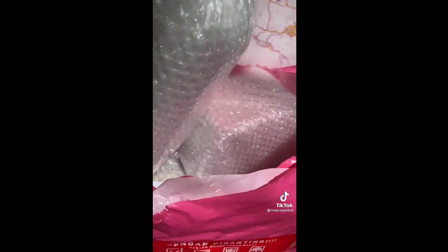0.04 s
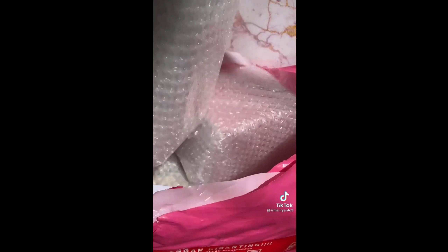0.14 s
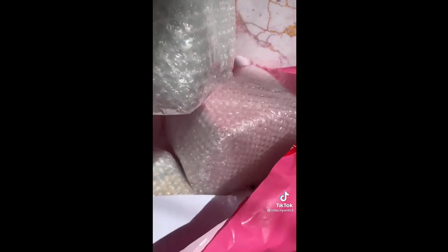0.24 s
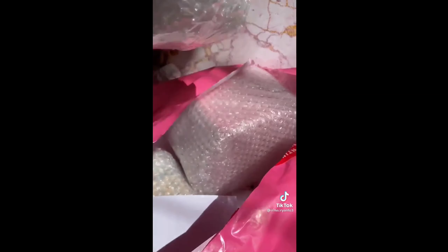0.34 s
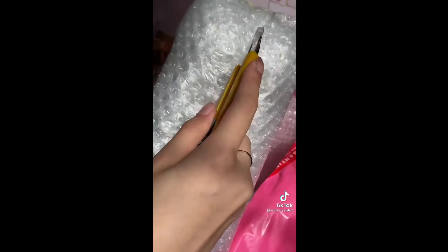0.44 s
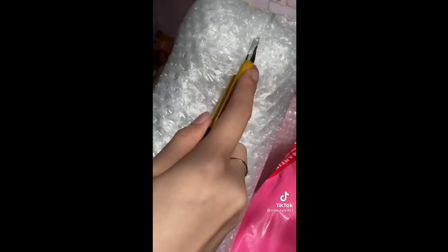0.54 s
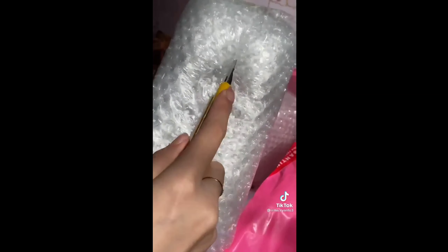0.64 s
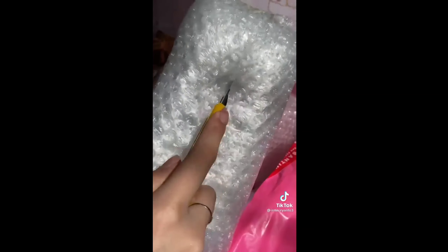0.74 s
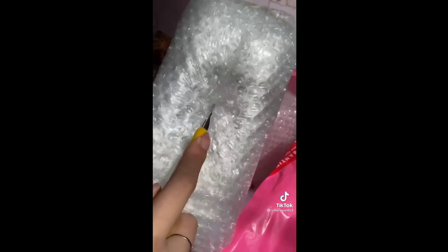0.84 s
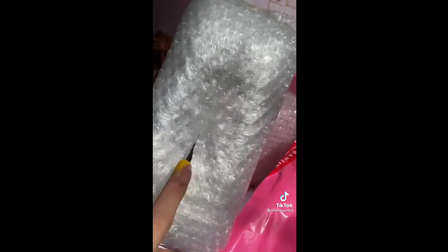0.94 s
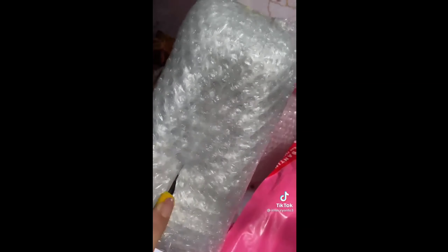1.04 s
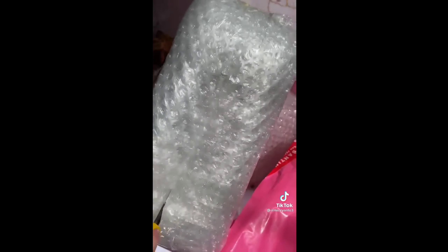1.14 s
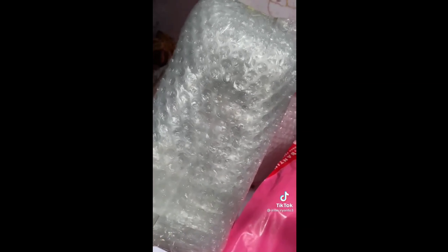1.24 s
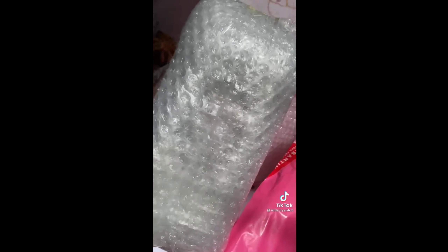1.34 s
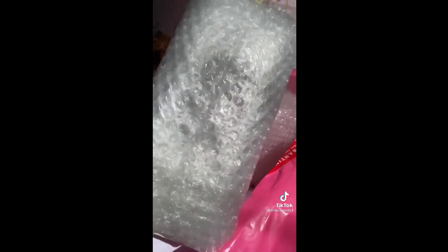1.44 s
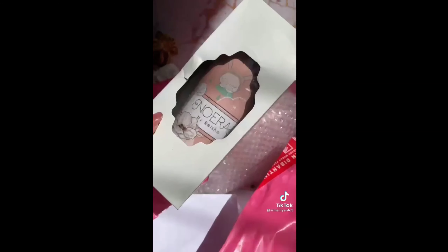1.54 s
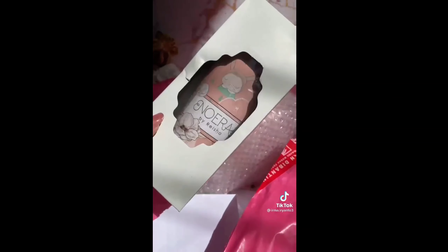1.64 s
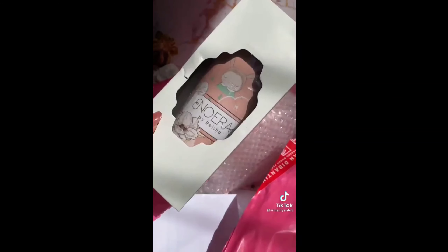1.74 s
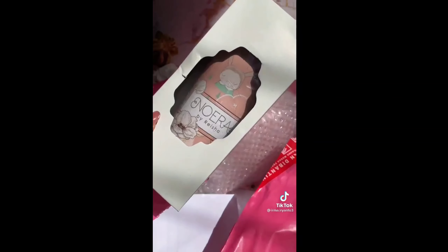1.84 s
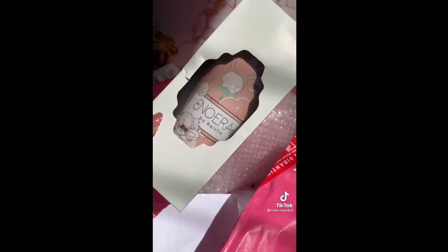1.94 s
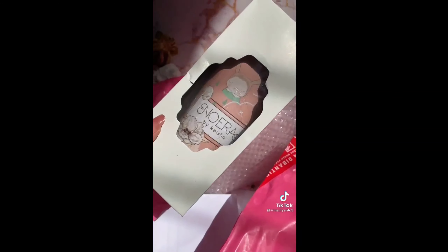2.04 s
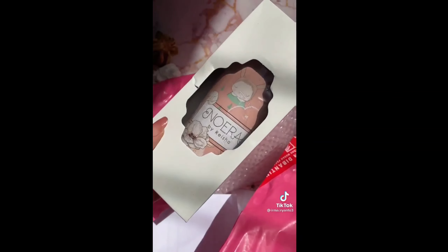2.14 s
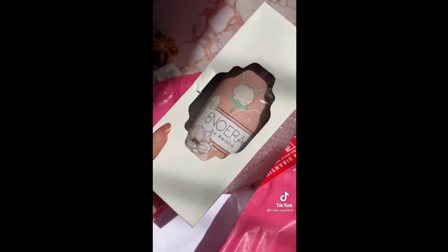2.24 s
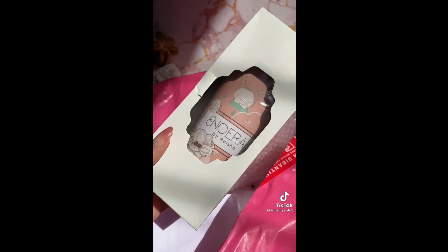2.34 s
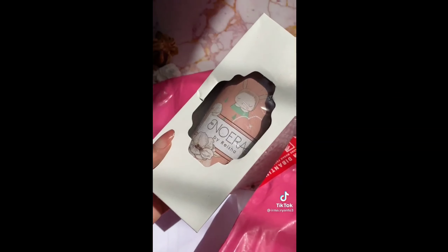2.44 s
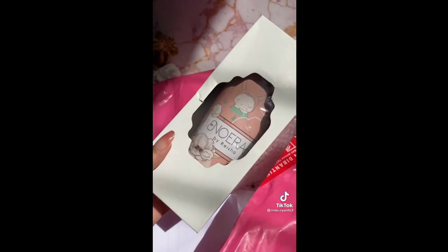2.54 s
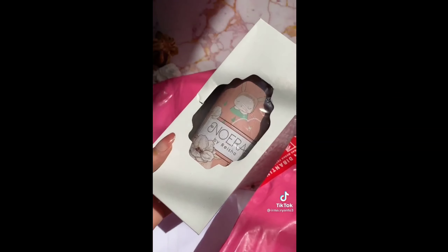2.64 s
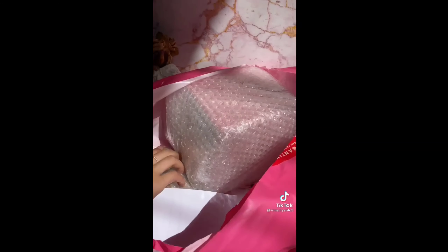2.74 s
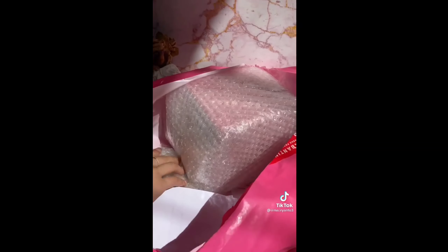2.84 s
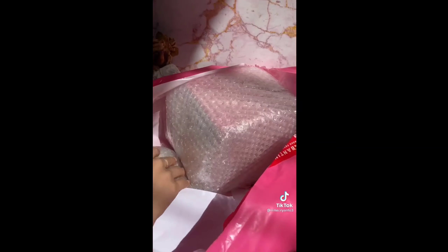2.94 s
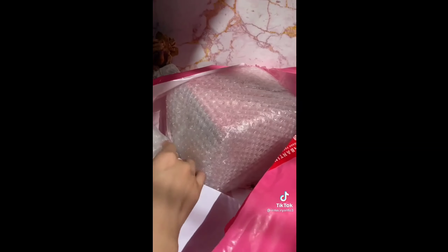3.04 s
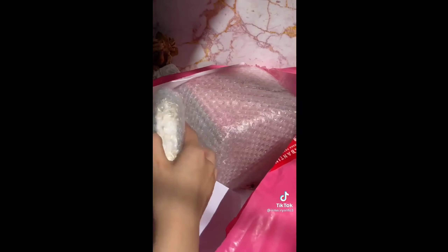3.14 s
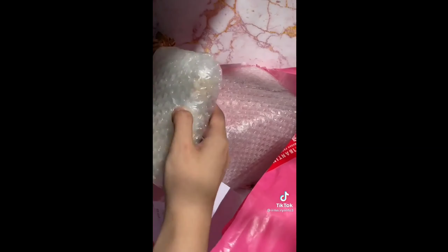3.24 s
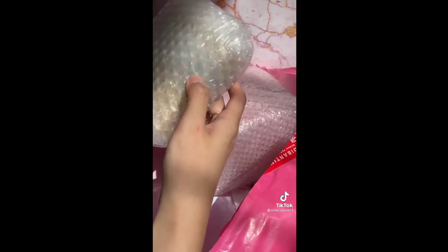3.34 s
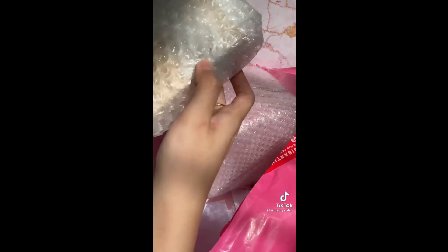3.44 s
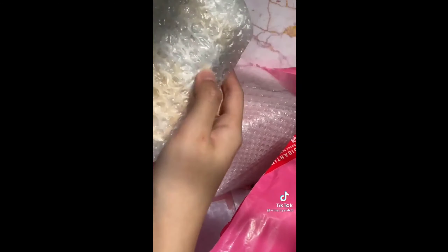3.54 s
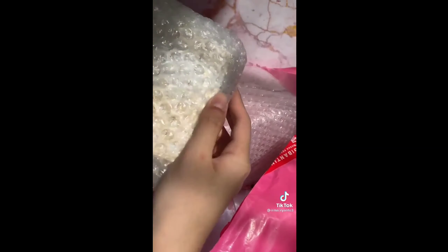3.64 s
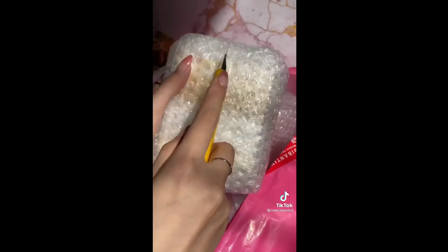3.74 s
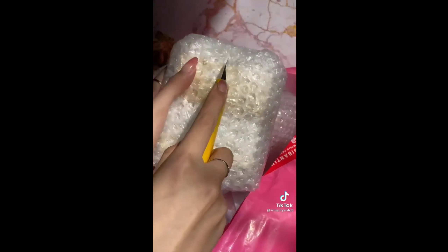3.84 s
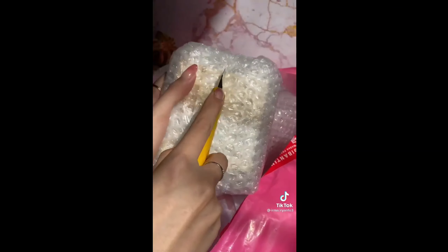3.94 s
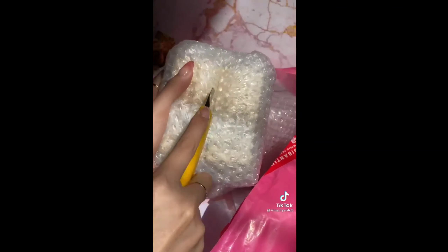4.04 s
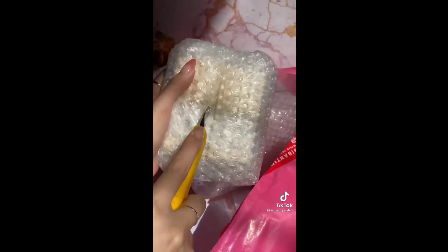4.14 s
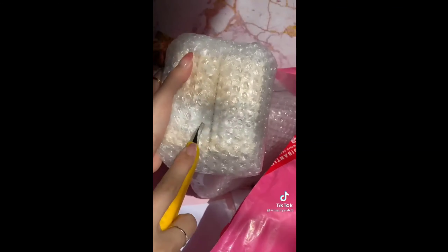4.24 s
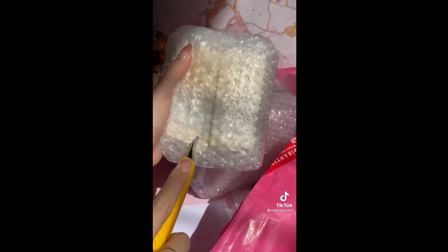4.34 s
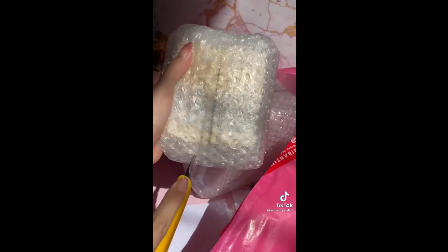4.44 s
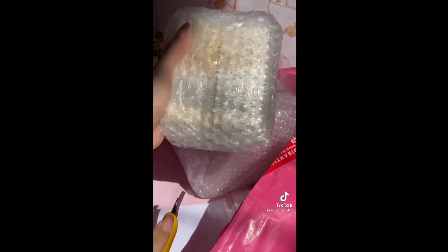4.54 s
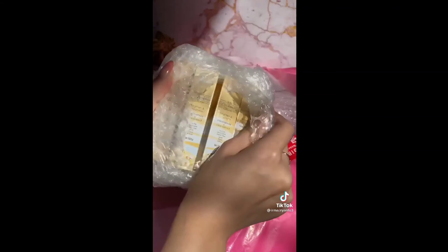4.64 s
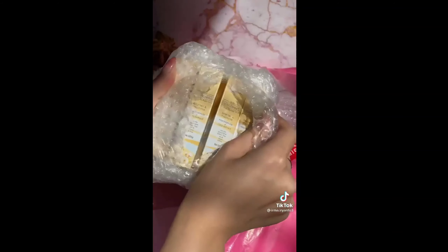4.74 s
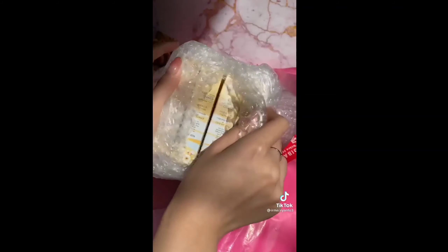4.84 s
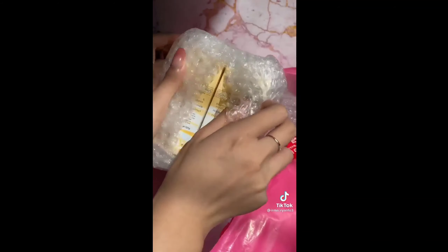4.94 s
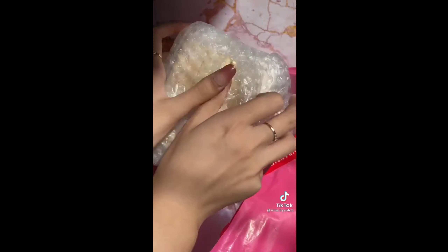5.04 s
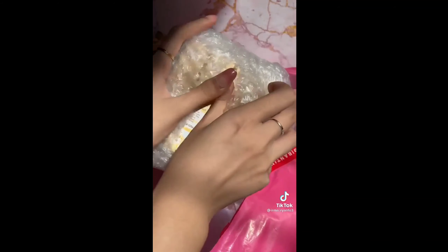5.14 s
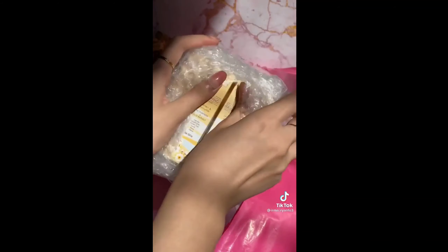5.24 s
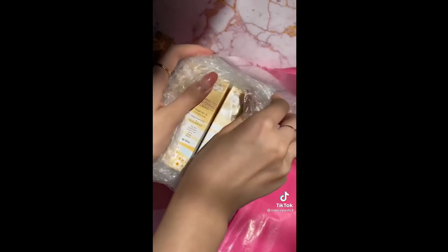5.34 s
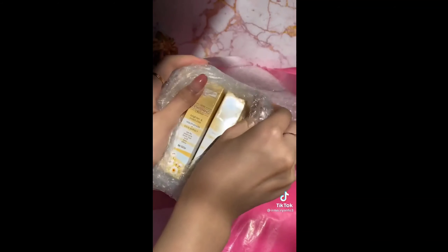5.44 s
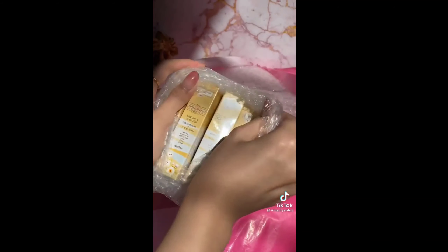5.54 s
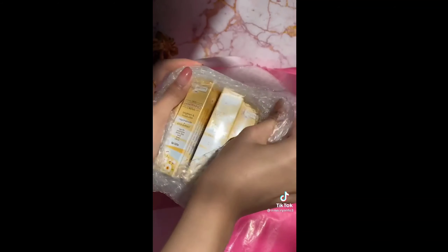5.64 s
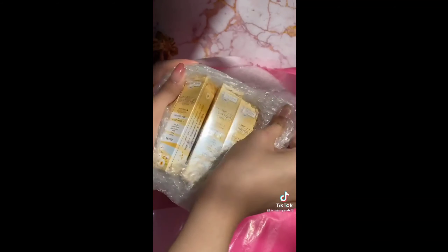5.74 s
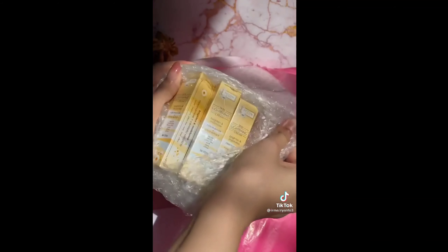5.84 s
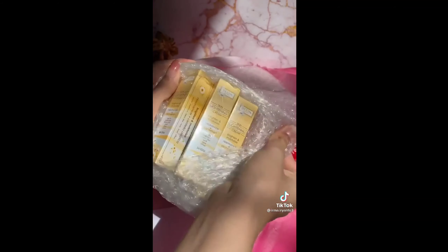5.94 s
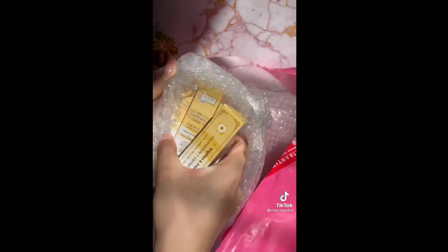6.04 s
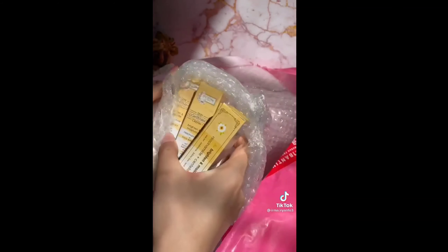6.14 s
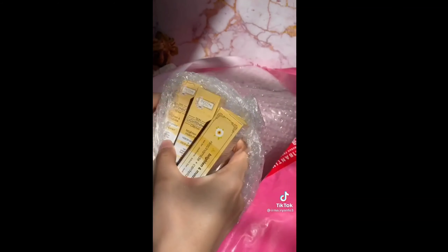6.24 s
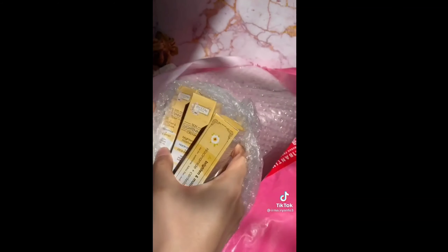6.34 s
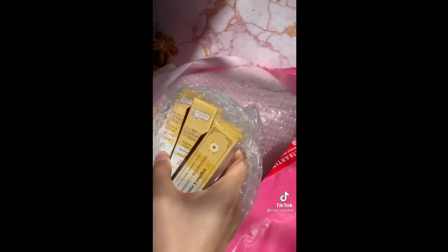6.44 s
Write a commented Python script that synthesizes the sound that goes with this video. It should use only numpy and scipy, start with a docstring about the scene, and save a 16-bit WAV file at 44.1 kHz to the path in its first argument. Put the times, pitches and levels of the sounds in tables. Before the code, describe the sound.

Very close, dry phone capture of bubble wrap being cut and opened by hand. Soft rustle first, then a fast uneven run of loud round pops as a blade bursts cells, a near-quiet gap with faint handling, short rubbery squeaks, a low bump, a second dense popping cut, and finally bright, thin crackling while the film is pulled apart, ending with duller squeezed pops.

```python
"""Bubble wrap pops as a blade bursts rows of air cells: each pop is a crack that slides down in pitch,
as bending waves in the film carry treble fastest. Thin jets of air hiss from pierced cells and skins whistle
downwards as they slide free. Two sheets squeak by sticking and slipping, fingers make the film rustle and
crackle, and the handling rumbles. It all happens close to a phone, whose two microphone ports differ in phase."""
import sys
import numpy as np
from scipy import signal
from scipy.fft import rfft, irfft, next_fast_len
from scipy.io import wavfile
from scipy.ndimage import uniform_filter1d, map_coordinates

SR = 44100
rng = np.random.default_rng(int(sys.argv[2]) if len(sys.argv) > 2 else 0)


def generate_wav(sig):
    """Save sig (samples, or channels by samples) to the path in sys.argv[1] as 16-bit PCM at SR."""
    pcm = np.round(np.clip(np.atleast_2d(sig).T, -1, 1) * 32767).astype(np.int16)
    wavfile.write(sys.argv[1], SR, pcm)


def convert_level_to_amplitude(level_db):
    """Map a level in decibels to its linear amplitude factor."""
    exponent = np.asarray(level_db, float) / 20
    return 10 ** exponent


N = 286209  # length in samples

# Levels in the tables are settings to which the functions may add fixed offsets and random changes.

# Film rustle and air cells under the moving hands, with sudden starts and stops of each move.
# Each row: time in seconds, film level in dB, air cell level in dB.
HAND_LEVELS = [(0, -47.5, -44.5), (.214, -59, -47.5), (.365, -69.5, -70), (.38, -52.5, -52.5),
               (0.443, -49, -43), (.6, -52, -35.5), (.85, -40.5, -37.5), (1.1, -58, -40), (1.278, -63, -43),
               (1.4, -68, -57), (1.5, -65, -61), (1.518, -45, -47.5), (1.732, -47.5, -44),
               (1.89, -61, -55.5), (2.2, -57.5, -60.5), (2.37, -55.5, -55.5), (2.4, -64.5, -65),
               (2.551, -67, -72), (2.56, -47.5, -45), (2.67, -56, -61.5), (2.7, -50, -41.5),
               (2.8, -43, -39.5), (2.95, -47.5, -37.5), (3.05, -56.5, -43), (3.2, -55.5, -37.5),
               (3.386, -56, -62.5), (3.43, -51, -39), (3.47, -59, -53), (3.54, -68, -46), (3.68, -58, -51),
               (3.7, -60, -66), (3.73, -50.5, -52), (3.88, -49, -67), (3.89, -45, -47), (4.17, -38, -33.5),
               (4.42, -54, -51), (4.44, -57.5, -43), (4.57, -53, -61), (4.59, -43.5, -60.5),
               (4.67, -37.5, -41.5), (4.85, -44.5, -46), (5.03, -48, -42.5), (5.19, -36.5, -45),
               (5.28, -37, -44), (5.35, -29, -37), (5.45, -35, -44), (5.53, -33.5, -46), (5.58, -38.5, -50),
               (5.67, -28.5, -44), (5.77, -34, -50), (5.83, -31.5, -59), (6.019, -37, -59),
               (6.028, -34, -34.5), (6.16, -34, -32.5), (6.19, -36, -41.5), (6.25, -40, -44.5),
               (6.49, -41.5, -40)]
# Handling rumble. Each row: time in seconds, level in dB.
RUMBLE_LEVELS = [(0, -47.5), (.214, -53.5), (.4, -69.5), (0.551, -50.5), (.85, -41.5), (1.278, -45),
                 (1.45, -73), (1.6, -47.5), (1.75, -45), (2.1, -62.5), (2.55, -60), (2.57, -50), (2.8, -58),
                 (3.386, -58.5), (3.54, -40), (3.62, -52), (3.68, -48), (3.7, -60), (3.88, -65),
                 (3.89, -37.5), (4.1, -64), (4.42, -56), (4.6, -63.5), (4.9, -54), (5.3, -61), (5.8, -68),
                 (6.18, -61.5), (6.49, -57.5)]
# Tone colour of the thin film. Each row: frequency in Hz, relative level in dB.
FILM_COLOUR = [(300, -30), (1000, -8), (2700, 0), (4500, -3), (7000, -1), (9000, -3), (12000, -9),
               (14000, -9), (16000, -11)]
# Tone colour of the air cells. Each row: frequency in Hz, relative level in dB.
CELL_COLOUR = [(100, -31.5), (250, -4.5), (500, -2.5), (1000, 0), (1600, -7.5), (3000, -18), (4500, -24.5),
               (7000, -47)]
# Tone colour of the rumble. Each row: frequency in Hz, relative level in dB.
RUMBLE_COLOUR = [(15, -30), (35, -6.5), (65, -4.5), (120, -5.5), (220, -6.5), (500, -26)]
# Air hissing from a pierced cell. Each row: start in seconds, level in dB, length in seconds.
AIR_LEAKS = [(0.458, -17.5, 0.013), (0.672, -32, 0.006), (0.807, -26, 0.0043), (0.881, -23.5, 0.012),
             (0.979, -15, 0.0047), (3.895, -12, 0.0046), (3.98, -18, 0.011)]
# Tone colour of that hiss. Each row: frequency in Hz, relative level in dB.
JET_COLOUR = [(1500, -31), (4000, -8.5), (12000, -2.0), (16000, -18.5)]
# A cell skin sliding free, its slips slowing down.
# Each row: start in seconds, level in dB, first pitch in Hz, last pitch in Hz, length in seconds.
SKIN_GLIDES = [(2.72, -34, 1350, 598, 0.06), (3.5, -26.5, 7000, 4460, 0.0094),
               (3.538, -34, 6000, 4900, 0.0076)]
# Sheets rubbing. Each row: start in seconds, level in dB, middle pitch in Hz, length in seconds.
SHEET_SQUEAKS = [(2.772, -25.5, 1300, 0.0069), (2.78, -19, 1150, 0.024), (2.815, -37, 1150, 0.015),
                 (2.826, -29, 900, 0.018), (2.843, -25, 900, 0.0086), (2.927, -18.5, 950, 0.022),
                 (2.996, -24, 950, 0.012), (3.08, -22.5, 1350, 0.042), (3.098, -21, 1150, 0.034),
                 (3.122, -23.5, 1200, 0.03), (3.14, -34.5, 1250, 0.027), (3.202, -38.5, 950, 0.026),
                 (6.031, -28.5, 900, 0.018), (6.097, -28.5, 1046, 0.052)]
# Slip patterns of a squeak. Each row: multiple of its pitch, middle level in dB.
SLIP_PARTIALS = [(.33, -20), (.5, -14), (1, .4), (1.5, -7), (2, -13), (2.5, -13)]
# Tone colour of the scrape in a squeak. Each row: frequency in Hz, relative level in dB.
SCRAPE_COLOUR = [(250, -16.5), (600, -4.5), (1200, 15.5), (2000, -9), (3200, -16), (5000, -25.5)]
# Clearly heard bursting cells and snapping creases.
# Each row: time in seconds, level in dB, snap (treble) in dB relative to that level.
CLEAR_POPS = [(0.1734, -29.5, 3.5), (0.4743, -1.5, -14), (0.4777, -5, -24), (0.4847, -11, -6),
              (.4951, -4, -2.5), (.502, -3.5, -17), (.5194, -16, -5), (0.5469, -7, -12), (0.5528, -.6, -63),
              (0.6378, -8.5, -16), (0.6476, -12, -8.5), (.6631, -14.5, -6), (.6887, -16, 5.5),
              (0.7135, -19.5, 0), (0.719, -13, -1), (0.7384, -4, -43), (.7418, -2.5, -10),
              (0.7703, -7.5, -8), (.776, -6, -15), (0.7821, -11.5, -23), (0.7952, -19, 4.5),
              (.842, -5.5, -12), (0.8651, -3, -12), (.87, -3.5, -16), (0.8964, -4, -10), (0.8996, -11, -25),
              (0.908, -16, -10), (.9203, -18.5, -3), (.9609, -14, -5), (.985, -5.5, -12), (.991, -9.5, -8),
              (1.0052, -3.5, -11), (1.04, -13, -19), (1.0562, -17.5, -9), (1.119, -15, -2.5),
              (1.1232, -10, -12), (1.1534, -19, -25), (1.1654, -5.5, -14), (1.1911, -9.5, -2.5),
              (1.197, -13.5, -8), (1.2291, -7, -26), (1.233, -7.5, -19), (1.2389, -14.5, -16),
              (1.2706, -13.5, -8), (1.547, -25, -4), (2.202, -33.5, -18), (2.316, -32.5, -6),
              (2.7838, -8.5, -23), (2.8551, -23, 0), (2.9343, -13.5, -21), (2.9378, -5, -18),
              (3.4208, -23.5, -35), (3.4243, -23, -47), (3.4982, -27, -27), (3.508, -28.5, -1),
              (3.5307, -18.5, -44), (3.5422, -24.5, -31), (3.614, -30, -27), (3.6624, -17.5, -58),
              (3.667, -25, -40), (3.889, -7, -9), (3.905, -30, 7), (3.9236, -10, -8), (3.9274, -5.5, -14),
              (3.9388, -8.5, -1), (3.9518, -7, -12), (3.9656, -4.5, -33), (3.988, -35, 14),
              (3.9905, -3.5, -35), (4.0098, -13, -3), (4.0312, -10.5, -26), (4.0527, -18, -5),
              (4.061, -11, -5), (4.075, -15, -23), (4.0858, -21, 0), (4.1004, -9.5, -6), (4.123, -4, -20),
              (4.174, -2, -25), (4.211, -20, -6), (4.2174, -7.5, -30), (4.262, -13, -29), (4.281, -6, -13),
              (4.3346, -18, -19), (4.3407, -20, -26), (4.3484, -9.5, -9), (4.364, -16, -2),
              (4.376, -7, -26), (4.396, -8.5, -8.5), (4.4126, -13, -9), (4.4154, -14.5, -4),
              (4.5877, -23.5, 6), (4.6103, -13, -4), (4.6616, -8, -9.5), (4.7557, -18, -32),
              (4.8613, -21.5, -15), (5.2, -27, 2.5), (5.213, -32, 16.5), (5.2882, -6, -9),
              (5.3176, -6, -11), (5.34, -10.5, -1), (5.3703, -6, -7), (5.3752, -6, -4.5),
              (5.4374, -15.5, 0), (5.531, -23.5, 6), (5.5357, -23.5, 12.5), (5.6155, -28.5, 16),
              (5.6302, -28.5, 13), (5.6519, -22, 10.5), (5.719, -19, -10.5), (5.82, -31, 2),
              (5.828, -24.5, 9), (5.868, -16, -13), (5.9125, -19.5, 2), (6.005, -17, 5),
              (6.0567, -14.5, -21), (6.093, -15, -25), (6.1482, -13.5, -24), (6.163, -15, -8),
              (6.1739, -16.5, -21.5), (6.2075, -17, -21), (6.2169, -12, -5)]
# Moves of the hands, from lifting the parcel, through cutting and tearing, to squeezing the cells.
# Each row: start in seconds, end in seconds, thump in dB relative to the pop, small pops per second,
# their middle level in dB, their middle snap in dB relative to that level.
HAND_MOVES = [(0, .45, -12.5, 0, -40, 0), (.46, .56, -8, 0, -40, 0), (.63, 1.292, -10, 40, -23.5, -9),
              (1.3, 2.55, -12.5, 1, -50, 2.5), (2.56, 3.3, -19, 0, -40, 0),
              (3.41, 3.51, -14, 14.5, -40, -21), (3.521, 3.681, -5, 30, -33, -22),
              (3.887, 4.329, -17.5, 48.5, -29, 0), (4.328, 4.43, -10, 30, -18, 3),
              (4.577, 5.098, -17, 10.5, -34, -6), (5.174, 5.441, -12, 28, -28.5, 9),
              (5.439, 6.009, -27, 61.5, -35.5, 11.5), (6.021, 6.359, -21.5, 43, -23, -11)]
# Fading of the brief echo. Each row: frequency in Hz, time to fade by 60 dB in seconds.
ROOM_DECAY = [(150, 0.084), (500, 0.049), (3000, 0.064), (12000, 0.045)]
# Likeness of the two ports, before their differing part is raised and its bass thinned.
# Each row: frequency in Hz, likeness from 0 to 1.
PORT_LIKENESS = [(60, .996), (200, .995), (500, .95), (1200, .99), (2500, .95), (4500, .75), (7000, .9),
                 (8000, .965), (11500, .97), (13000, .75), (15000, .6)]
# Phase of the left port ahead of the right, held near half a turn at 8-12 kHz.
# Each row: frequency in Hz, phase in radians.
PORT_PHASE = [(100, 0), (950, .05), (2800, .6), (5000, 1.6), (7000, 2.4), (8200, 3.0), (11700, 3.25),
              (13000, 4.2), (16000, 6)]
# Band limits of the phone. Each row: frequency in Hz, gain in dB.
PHONE_BAND = [(20, -12), (60, 0), (15500, 0), (15900, -45), (16700, -55), (17000, -90)]

THUMP_SPREAD_DB, SNAP_SPREAD_DB, SMALL_SPREAD_DB = 2.5, 7, 6
TRAIL_S = .004  # small pops are drawn back towards a point this long after the latest clear pop or move start
# Each clear pop shakes the wrap: time to fade by 60 dB, and levels relative to the pop.
STIR_T60_S, STIR_FILM_DB, STIR_CELLS_DB, STIR_RUMBLE_DB = 0.086, -34.5, -31.5, -37


def unit(x):
    """Scale to an rms (average strength) of 1."""
    return x / np.sqrt(np.mean(x ** 2) + 1e-20)


def along(points, hz):
    """Read a curve of (Hz, value) points on a logarithmic pitch axis."""
    f, v = np.transpose(points)
    return np.interp(np.log(hz + 1), np.log(f + 1), v)


def wobble(rate):
    """A smooth random curve with rate random knots a second."""
    knots = rng.standard_normal(int(N * rate / SR) + 4)
    return map_coordinates(knots, [np.arange(N) * rate / SR])


def filtered(x, response):
    """Multiply the spectrum of x by a response that depends on frequency."""
    m = next_fast_len(N + SR // 4)
    return irfft(rfft(x, m) * response(np.fft.rfftfreq(m, 1 / SR)), m)[..., :N]


def coloured(x, colour):
    """Give x a tone colour from a table, then an rms of 1."""
    return unit(filtered(x, lambda hz: convert_level_to_amplitude(along(colour, hz))))


def bending(hz, travel_ms, slope):
    """Bending waves take travel_ms * (1 kHz / Hz) ** slope; time zero is the arrival of 2.5 kHz."""
    khz = np.maximum(hz, 60) / 1000
    return np.exp(-2j * np.pi * travel_ms * (khz ** (1 - slope) / (1 - slope) - khz / 2.5 ** slope))


def causal(gain_db):
    """The response with this gain that rings after the blow, never before."""
    cepstrum = irfft(np.log(convert_level_to_amplitude(gain_db)))
    half = len(cepstrum) // 2
    # folding the later half onto the earlier one leaves only ringing after the blow
    cepstrum[1:half] *= 2
    cepstrum[half + 1:] = 0
    return np.exp(rfft(cepstrum))


def patches(x, patchy_db):
    """Regions of the film come and go: random gain, smooth over pitch and time."""
    z = signal.stft(x, nperseg=256)[2]
    field = uniform_filter1d(rng.standard_normal(z.shape), size=5, axis=0)
    field = uniform_filter1d(field, size=6, axis=1)
    return signal.istft(z * convert_level_to_amplitude(patchy_db * unit(field)), nperseg=256)[1][:N]


def stir():
    """How much the wrap still trembles: each clear pop adds energy, which dies away."""
    s, db, _ = np.transpose(CLEAR_POPS)
    kicks = np.bincount(np.round(s * SR).astype(int), convert_level_to_amplitude(2 * db), N)
    kept_per_sample = convert_level_to_amplitude(-120 / STIR_T60_S / SR)
    return np.sqrt(np.abs(signal.lfilter([1], [1, -kept_per_sample], kicks)))


def stirred(db, more_db, shaken):
    """Add the energy of the trembling wrap to a level in dB."""
    return 10 * np.log10(convert_level_to_amplitude(2 * db) + (convert_level_to_amplitude(more_db) * shaken) ** 2)


def rumble(shaken):
    """Handling shakes the parcel: low-pitched noise with a drifting level."""
    db = np.interp(np.arange(N) / SR, *np.transpose(RUMBLE_LEVELS))
    db = stirred(db, STIR_RUMBLE_DB, shaken)
    return convert_level_to_amplitude(db + 3.0 + 2.5 * wobble(9.2)) * coloured(rng.standard_normal(N), RUMBLE_COLOUR)


def crackle(rate, spread_db):
    """Clumped random creases, a few far larger than the rest."""
    chance = rate / SR * convert_level_to_amplitude(2.5 * wobble(40))  # rate is the middle number of creases per second
    size_db = spread_db * np.minimum(rng.exponential(size=N), 2.5)
    creases = (rng.random(N) < chance) * rng.standard_normal(N) * convert_level_to_amplitude(size_db)
    return unit(creases)


def rustle(shaken):
    """Fingers work the film: creases tick in the thin sheet and sound fuller in the air cells."""
    s, film_db, cells_db = np.transpose(HAND_LEVELS)
    t = np.arange(N) / SR
    film_db = stirred(np.interp(t, s, film_db), STIR_FILM_DB, shaken)
    cells_db = stirred(np.interp(t, s, cells_db), STIR_CELLS_DB, shaken)
    grip_db = .7 * wobble(18) + 1.2 * wobble(70)  # the grip keeps changing
    creases = filtered(crackle(rate=1100, spread_db=3.6), lambda hz: bending(hz, 1.2, slope=.85))
    sheet = patches(creases + .9 * rng.standard_normal(N), patchy_db=2.2)
    cushion = patches(.7 * creases + .9 * rng.standard_normal(N), patchy_db=2.5)
    film = convert_level_to_amplitude(film_db + 5.5 + grip_db + 0.21 * wobble(29)) * coloured(sheet, FILM_COLOUR)
    cells = convert_level_to_amplitude(cells_db - 3.0 + grip_db + 1.4 * wobble(22)) * coloured(cushion, CELL_COLOUR)
    return film + cells


def leaks():
    """Air rushes out of pierced cells: short swells of bright noise."""
    out, t = np.zeros(N), np.arange(N) / SR
    jet = coloured(rng.standard_normal(N), JET_COLOUR)
    for s, db, length in AIR_LEAKS:
        progress = np.clip((t - s) / length, 0, 1)
        out += convert_level_to_amplitude(db) * np.sin(np.pi * progress) * jet
    return out


def glides():
    """Skins slide free in ever slower slips: falling whistles, the low one with a few harmonics, the high plain."""
    out, t = np.zeros(N), np.arange(N) / SR
    for s, db, first_hz, last_hz, length in SKIN_GLIDES:
        progress = np.clip((t - s) / length, 0, 1)
        phase = 2 * np.pi * np.cumsum(first_hz * (last_hz / first_hz) ** progress) / SR
        swell = np.sqrt(np.abs(np.sin(np.pi * progress)))
        for k in range(1, 5):
            if k * first_hz < SR / 5:
                out += convert_level_to_amplitude(db) * swell * convert_level_to_amplitude(-4 * k + 1.8 * wobble(200)) * np.sin(k * phase)
    return out


def squeaks():
    """Stick and slip: an unsteady tone with uneven slips that add partials between the harmonics."""
    level, t = np.zeros(N), np.arange(N) / SR
    for s, db, _, length in SHEET_SQUEAKS:
        progress = np.clip((t - s) / length, 0, 1)
        level += convert_level_to_amplitude(db + 7) * np.sqrt(progress) * (1 - progress)
    starts, _, hz, lengths = np.transpose(SHEET_SQUEAKS)
    pitch = np.interp(t, starts + lengths / 3, hz) * (1 + .06 * wobble(160))
    phase = 2 * np.pi * np.cumsum(pitch) / SR
    tone = np.zeros(N)
    for k, db in SLIP_PARTIALS:
        tone += convert_level_to_amplitude(db + 1.5 * wobble(200)) * np.sin(k * phase + .9 * wobble(300))
    scrape = coloured(rng.standard_normal(N), SCRAPE_COLOUR)
    return level * (tone + .7 * scrape)


def bursts(count=40):
    """List all pops (seconds, level, thump, snap in dB): small ones crowd behind the clear ones."""
    rows, clear = list(CLEAR_POPS), np.transpose(CLEAR_POPS)[0]
    for start, end, _, rate, small_db, snap_db in HAND_MOVES:
        times = start + (end - start) * rng.random(count)
        small_dbs = small_db + SMALL_SPREAD_DB * rng.uniform(-1, 1, count)
        snap_dbs = snap_db + SNAP_SPREAD_DB * rng.uniform(-1, 1, count)
        # draw each small pop towards a point just after the latest clear pop or the start of the move
        latest = clear[np.searchsorted(clear, times) - 1] * (times > clear[0])
        latest = np.maximum(latest, start) + TRAIL_S
        times = latest + (times - latest) * rng.random(count)
        rows += list(zip(times, small_dbs, snap_dbs))[:round(rate * (end - start))]
    s, db, snap_db = np.transpose(rows)
    starts, _, thump_db = np.transpose(HAND_MOVES)[:3]
    scatter = rng.standard_normal(count * len(HAND_MOVES))[:len(s)]
    thump_db = thump_db[np.searchsorted(starts, s) - 1] + THUMP_SPREAD_DB * scatter
    return np.transpose([s, db, thump_db, snap_db])


def pops(size=2048):
    """Each burst is one impulse with its own thump and snap, spread by the film and coloured by its folds."""
    hz, out = np.fft.rfftfreq(size, 1 / SR), np.zeros(N + size)
    folds = rng.standard_normal((300, size // 2 + 1))
    parcel = 1 + .7j * hz * 90 / (230 ** 2 - hz ** 2 + 1j * hz * 90)  # the parcel booms briefly near 230 Hz
    before = size // 8  # room in samples for the treble that arrives early
    for (s, db, thump_db, snap_db), fold in zip(bursts(), folds):
        low, high = thump_db + 9.5, snap_db - 3.5
        colour = [(70, low - 32), (190, low - 4), (500, low), (1300, -2.0), (3000, -7.5),
                  (6000, high), (10000, high - 1.5), (16000, high - 6)]
        ring = causal(2.6 * unit(uniform_filter1d(fold, size=10)))
        travel_ms = 1.3 * convert_level_to_amplitude(1.779 * fold[0])  # cells burst nearer or farther along the film
        spectrum = convert_level_to_amplitude(along(colour, hz)) * ring * parcel * bending(hz, travel_ms, slope=.92)
        pulse = np.roll(irfft(spectrum, size), before)
        pulse *= 1 + 0.15 * fold[1:].repeat(2)  # the torn edge flutters
        out[round(s * SR) - before:][:size] += convert_level_to_amplitude(db + 23) * pulse
    return out[:N]


def room(x):
    """Table and wrap answer briefly; each tenth of a second meets a new tail of fading noise."""
    out, step = np.zeros(N + SR), SR // 10
    for start in range(0, N, step):
        hz, t, z = signal.stft(rng.standard_normal(2 * step), SR, nperseg=128)
        fade = convert_level_to_amplitude(-60 * t / along(ROOM_DECAY, hz)[:, None])
        tail = signal.istft(z * fade, SR, nperseg=128)[1]
        wet = signal.fftconvolve(x[start:start + step], tail / np.linalg.norm(tail))
        out[start:start + len(wet)] += wet
    return out[:N]


def ports(x):
    """Part of the sound differs between the ports, and the left one is ahead of the right in phase."""
    thinned = filtered(x, lambda hz: convert_level_to_amplitude(along([(120, -25), (300, 0)], hz)))  # bass is common to both
    z = signal.stft(thinned, nperseg=128)[2]
    scatter = signal.istft(z * np.exp(2j * np.pi * rng.random(z.shape)), nperseg=128)[1][:N]

    def shares(hz):
        angle = np.arccos(np.clip(along(PORT_LIKENESS, hz), 0, 1)) / 2
        return np.array([np.cos(angle), np.sin(angle)])

    def phase_turn(hz):
        return np.exp(.5j * along(PORT_PHASE, hz) * np.array([[1], [-1]]))

    mid, side = filtered(np.array([x, 1.5 * scatter]), shares)
    return filtered(np.array([mid + side, mid - side]), phase_turn)


def scene():
    """All the film's sounds, near, with a little room on the sharp ones."""
    shaken = stir()
    handling = rumble(shaken) + rustle(shaken)
    sharp = leaks() + glides() + squeaks() + pops()
    return ports(sharp + handling + convert_level_to_amplitude(-12) * room(sharp))


def roll_off(x):
    """The treble ends steeply here."""
    return signal.sosfilt(signal.butter(12, 16810, fs=SR, output="sos"), x)


def record(dry):
    """The loudest cracks round off softly, then the phone limits the band."""
    rounded = dry / (1 + np.abs(dry / .8) ** 4) ** .25
    finished = filtered(rounded, lambda hz: convert_level_to_amplitude(along(PHONE_BAND, hz)))
    return roll_off(finished)


dry = scene()
out = record(dry)
generate_wav(out)
```